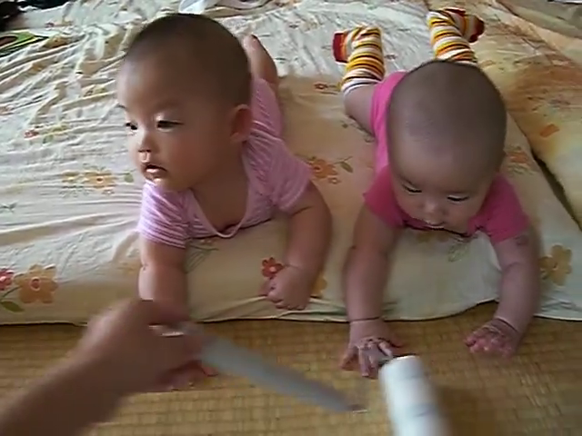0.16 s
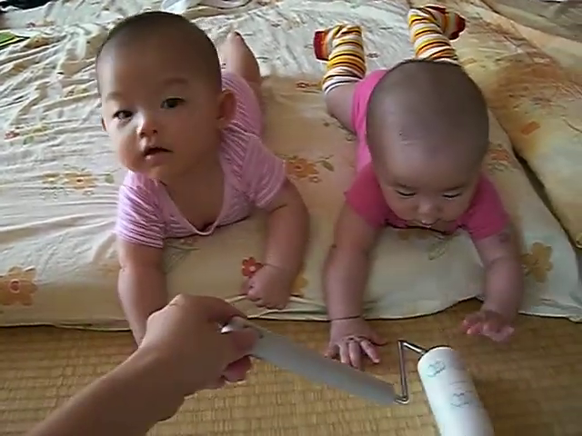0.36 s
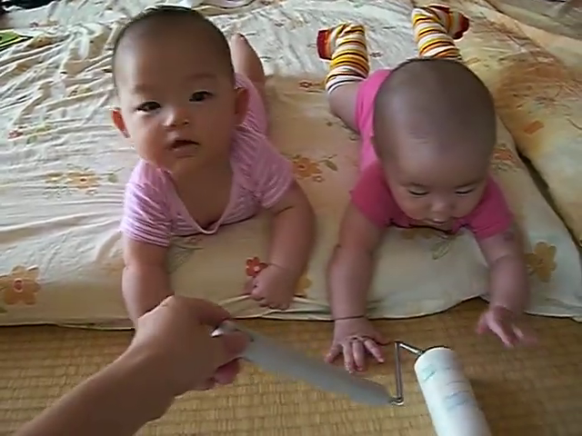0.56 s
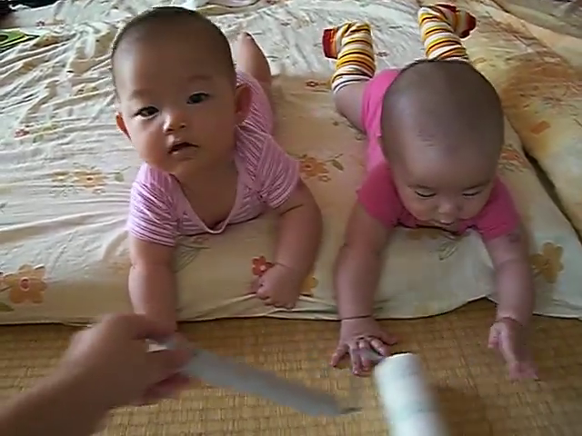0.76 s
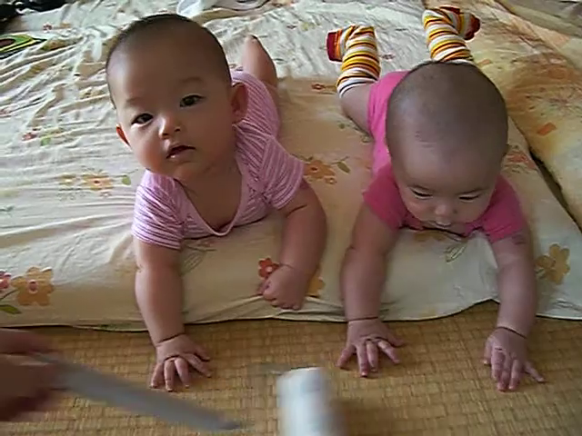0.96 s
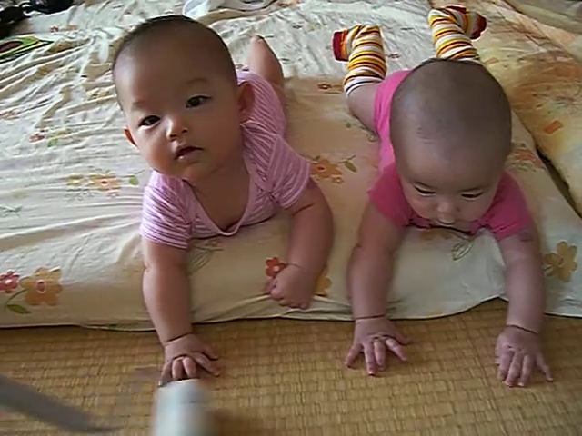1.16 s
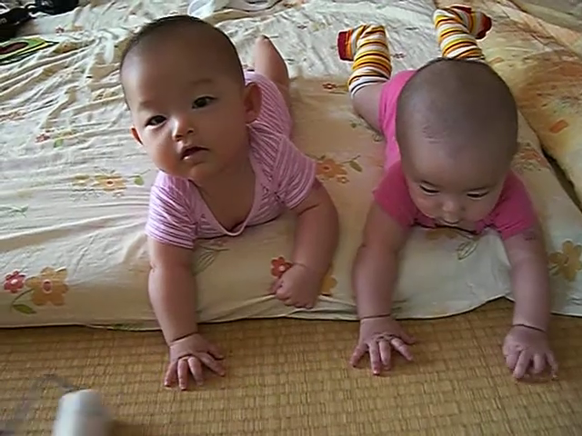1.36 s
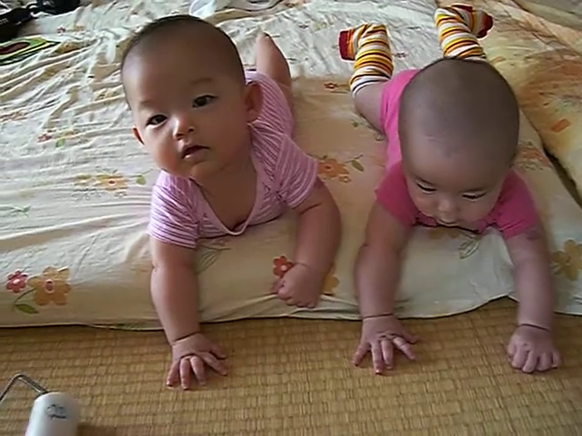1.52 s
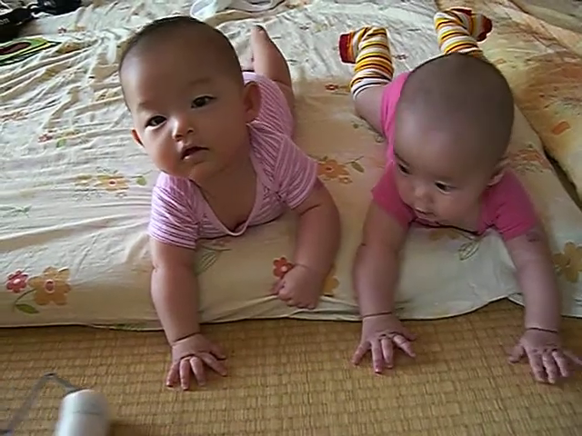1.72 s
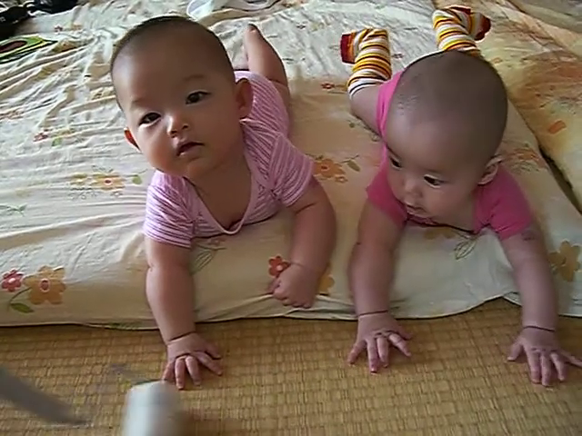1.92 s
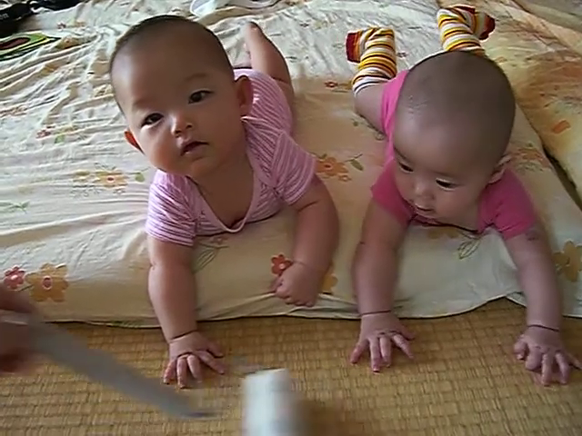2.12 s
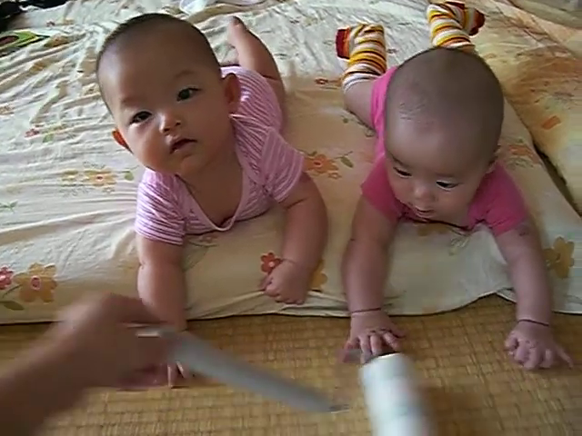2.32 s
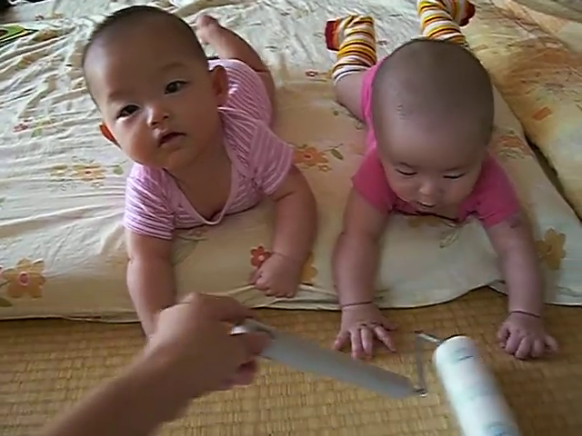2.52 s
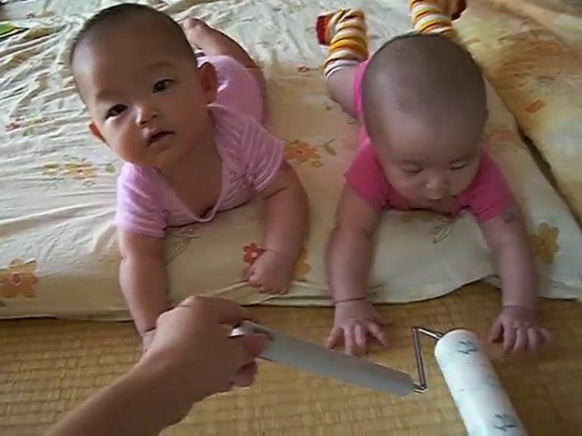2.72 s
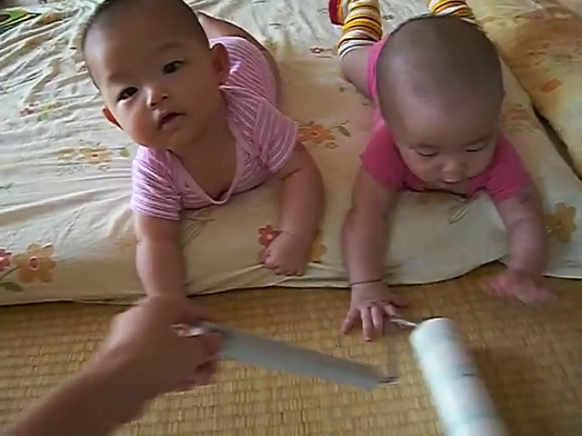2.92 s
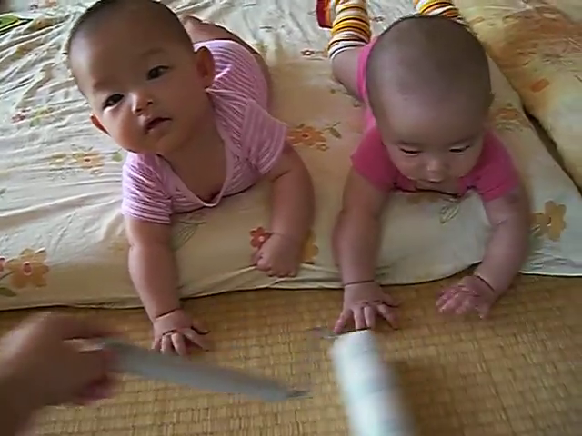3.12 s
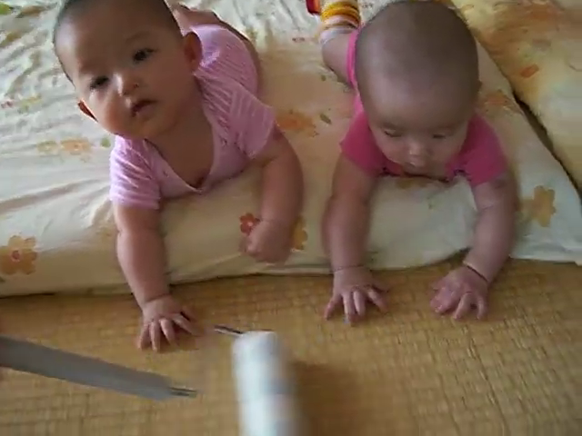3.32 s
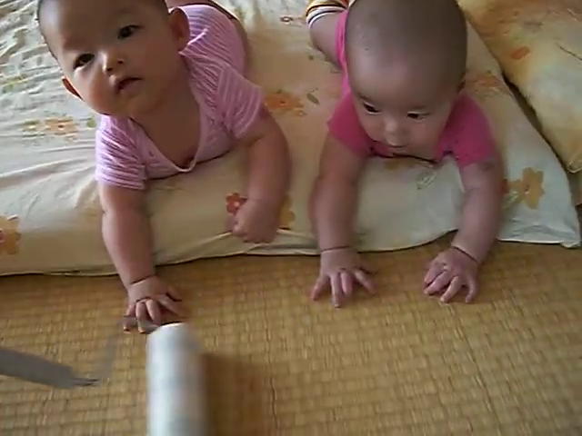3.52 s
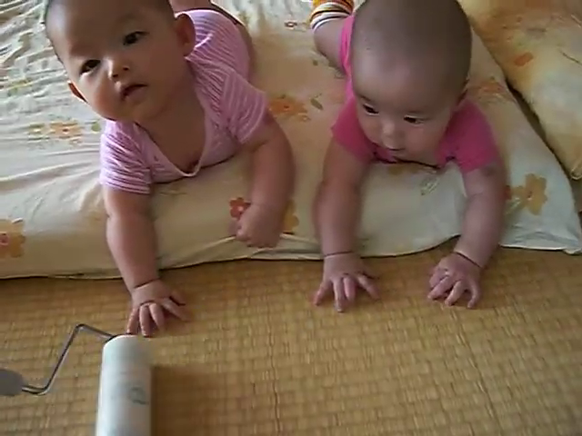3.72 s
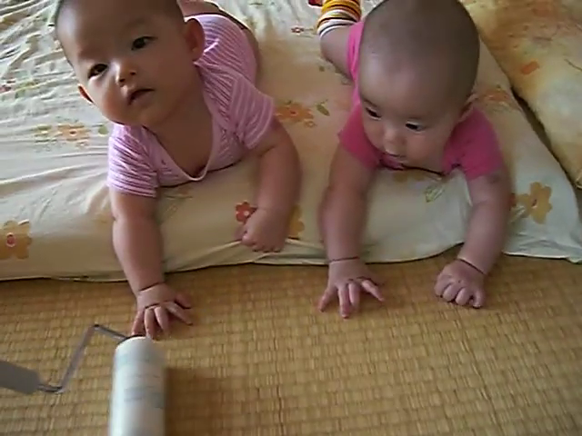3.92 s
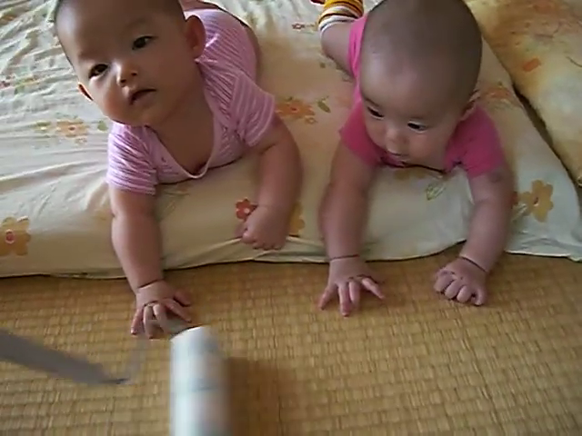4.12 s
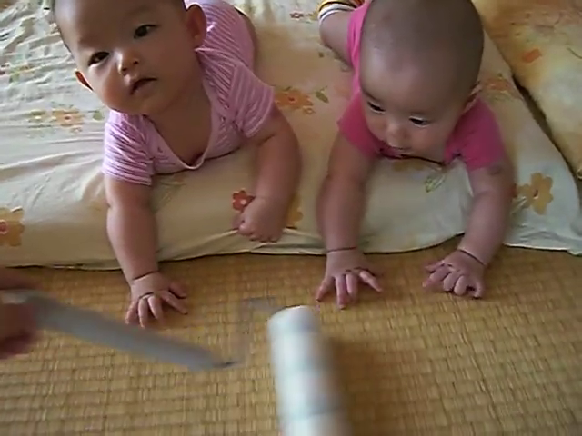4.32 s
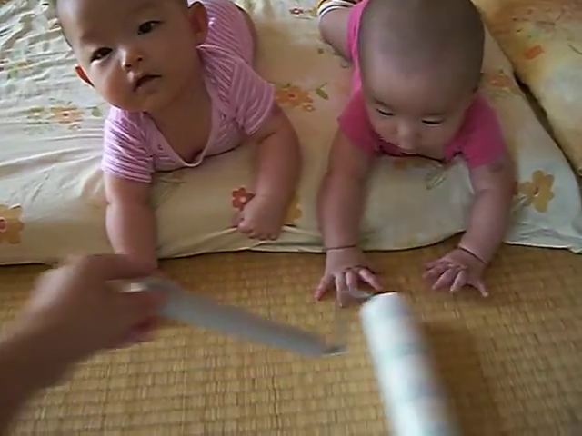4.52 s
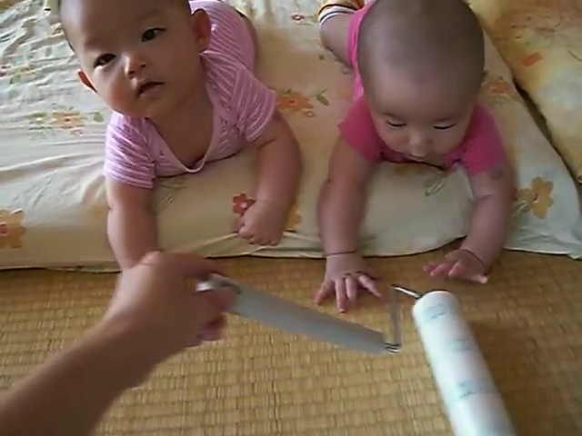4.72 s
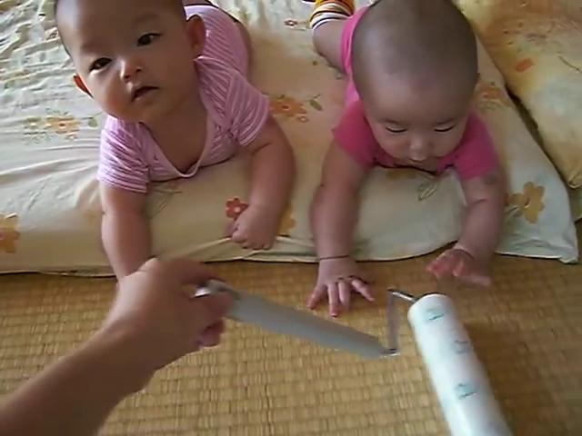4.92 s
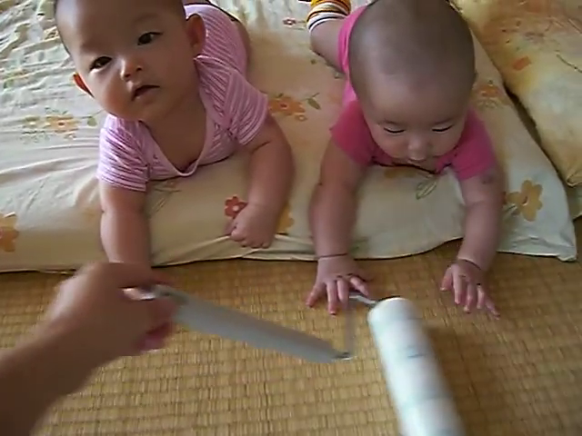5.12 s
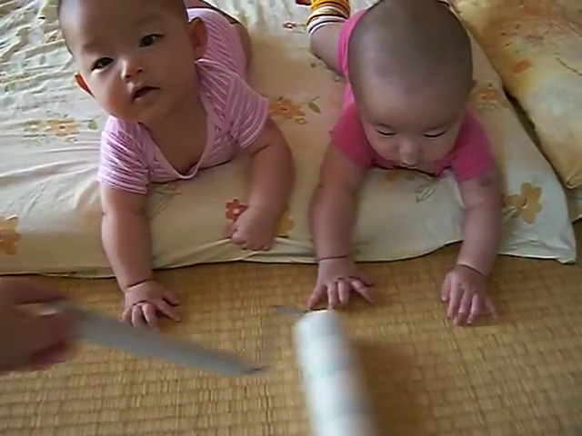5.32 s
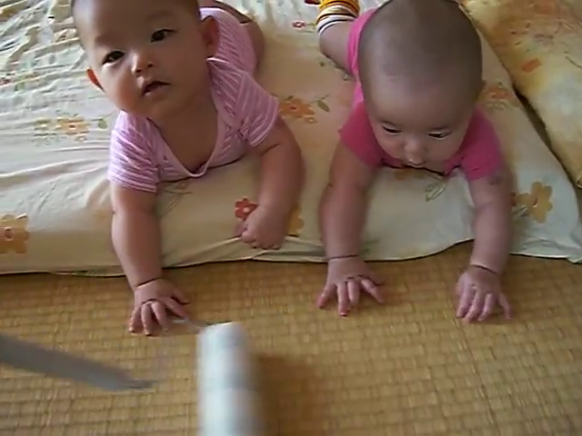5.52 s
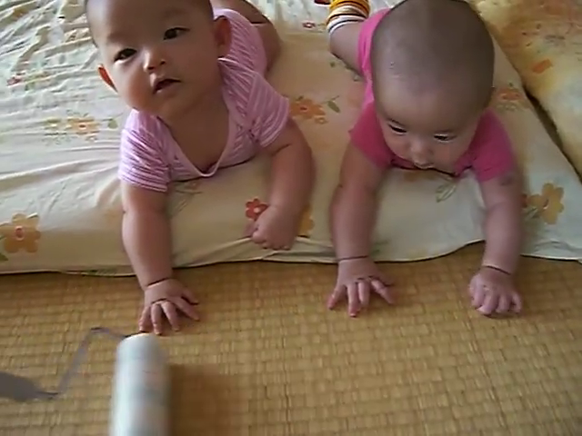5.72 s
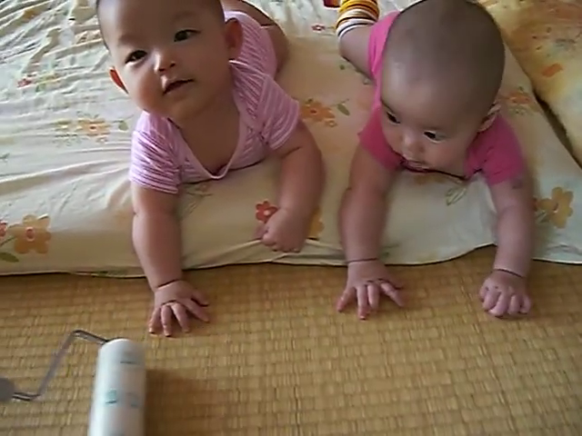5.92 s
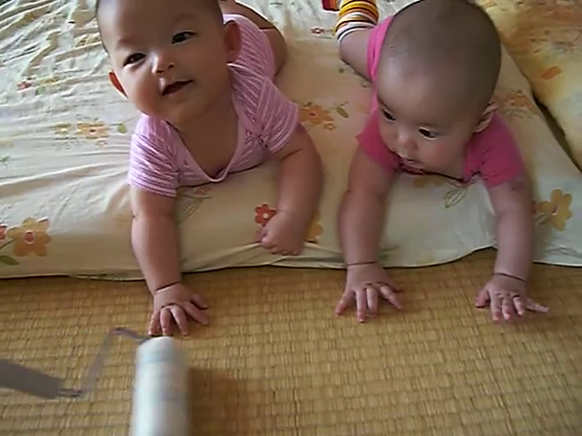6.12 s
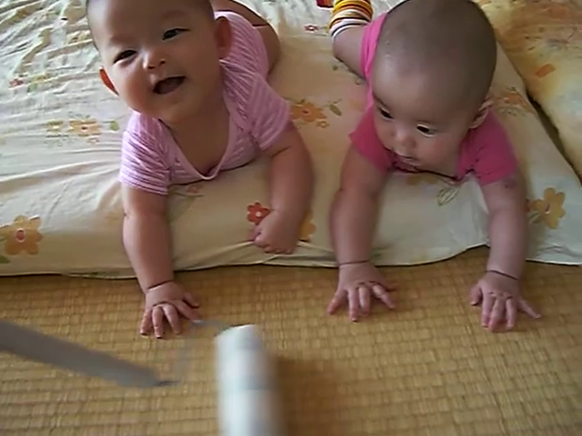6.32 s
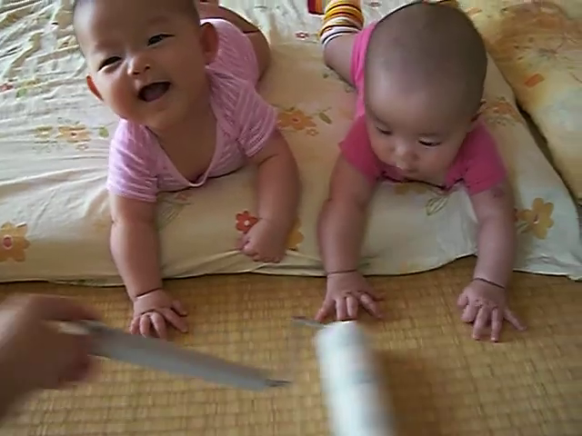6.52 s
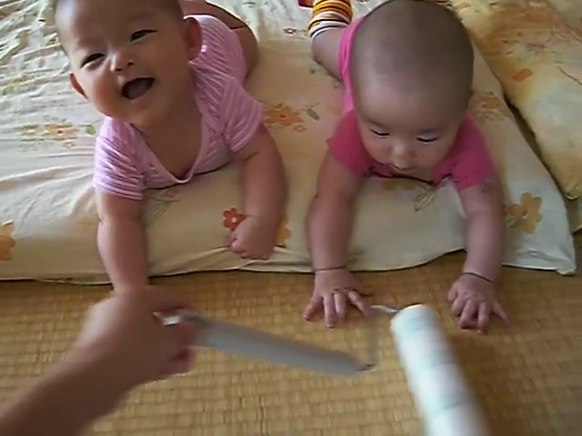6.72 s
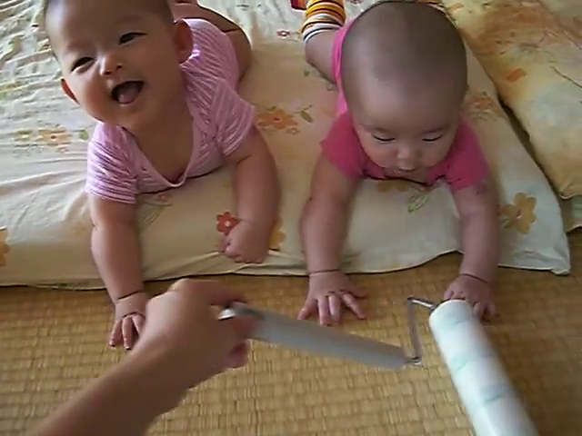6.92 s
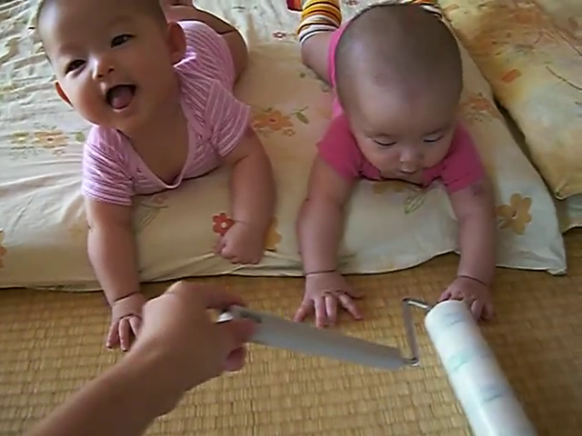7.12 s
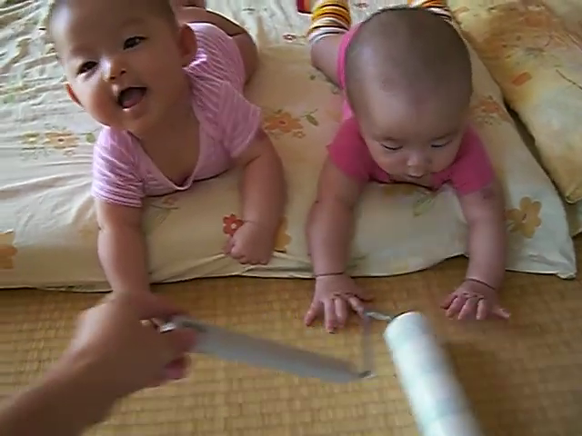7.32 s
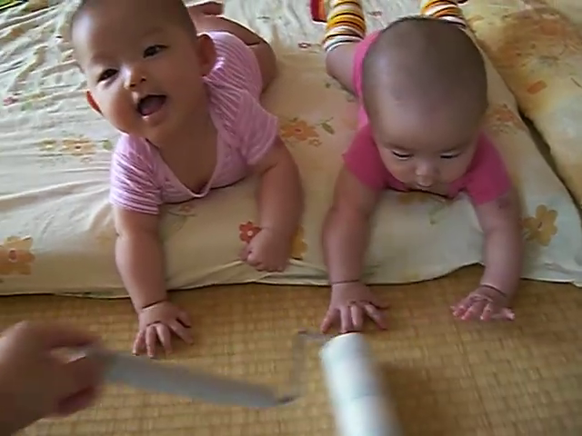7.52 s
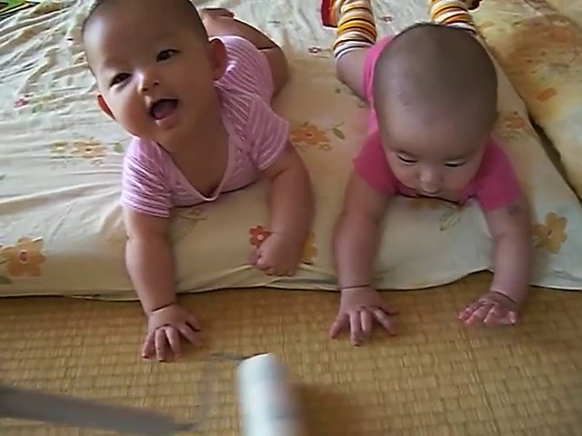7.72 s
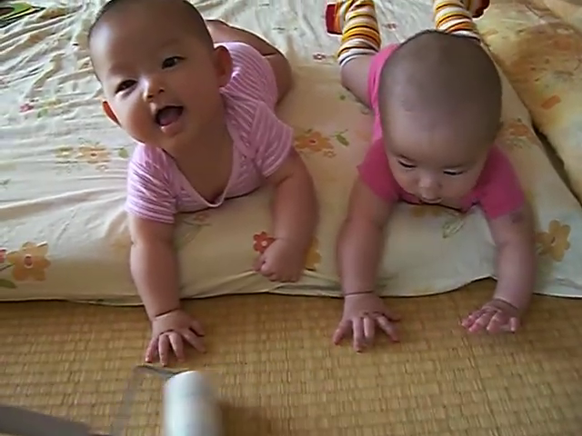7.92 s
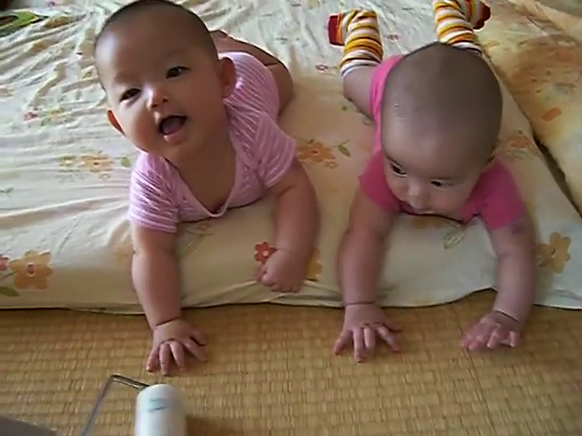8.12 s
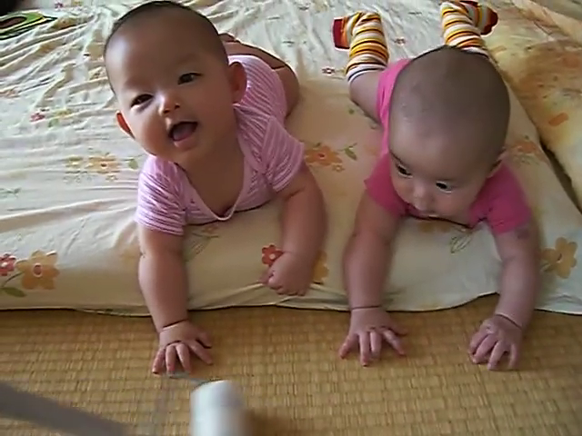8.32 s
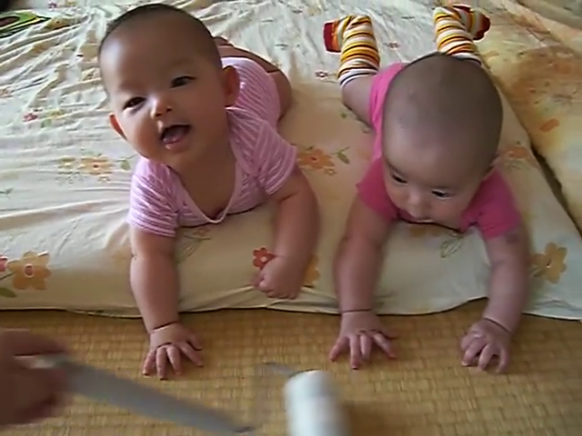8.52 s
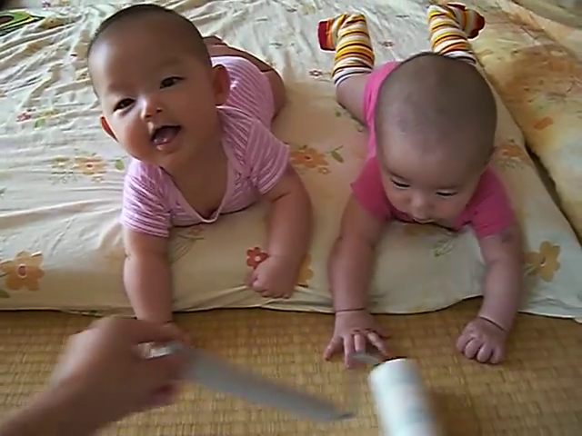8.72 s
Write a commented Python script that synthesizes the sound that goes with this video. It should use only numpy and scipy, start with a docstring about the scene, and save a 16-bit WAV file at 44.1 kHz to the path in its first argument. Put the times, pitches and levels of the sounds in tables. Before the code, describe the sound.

A sticky lint roller rolls back and forth over a woven straw mat with an even, crackling rasp.

```python
"""A sticky lint roller is pushed and pulled over a woven straw mat, about one stroke a second.
Its tape peels by stick and slip: straws let go in clumps of tiny snaps, which excite the tape sheet
and the modes of the hollow roll. The ridges of the weave make the roll rumble, and at one turn it
knocks on its axle. A near reflection, its delay following the roller, sweeps a comb filter through
the crackle. A small room reverberates over quiet air noise."""
import sys
import numpy as np
from scipy import signal
from scipy.fft import rfft, irfft, next_fast_len
from scipy.io import wavfile
from scipy.ndimage import uniform_filter1d, map_coordinates

SR = 44100
rng = np.random.default_rng(int(sys.argv[2]) if len(sys.argv) > 2 else 0)


def put_to_file(sound):
    """Save the sound as 16-bit audio at rate SR, in the file named by the first command-line argument."""
    columns = np.atleast_2d(sound).T  # one column per channel
    safe = np.clip(columns, -1, 1)
    whole_steps = np.round(safe * 32767)
    wavfile.write(sys.argv[1], SR, whole_steps.astype(np.int16))


N = 386309

# Arm strokes, pushes to the right and pulls to the left in turn: start t/s, fastest t/s, end t/s,
# crackle level/dB, then relative to it: roll ring level/dB, fizz level/dB, rumble level/dB
ARM_STROKES = [(-0.59, 0.099, 0.44, -23, -7.5, -3, -16.5), (0.54, 1.17, 1.56, -24, -6.5, -2, -15),
               (1.59, 2.311, 2.655, -23.5, -6, -2, -17), (2.75, 3.269, 3.805, -25.5, -7, -2.5, -15),
               (3.869, 4.471, 4.886, -25, -5.5, -1.5, -16), (4.95, 5.56, 5.93, -25, -6.5, -2.5, -15),
               (5.97, 6.559, 7.035, -23.5, -5, -2.5, -16), (7.179, 7.66, 8.085, -24.5, -7.5, -2, -14.5),
               (8.189, 8.558, 9.46, -24, -5.5, -3.5, -17.5)]
# Where the roller turns, before and after each stroke: place (0 = far right, 1 = far left)
TURN_PLACES = [.9, .11, 1, .08, .85, .1, .9, 0, .82, .1]
# Brief losses of adhesion: centre t/s, half length/s, change of level/dB
GRIP_LAPSES = [(0.108, 0.018, -4), (0.282, 0.018, -4.5), (0.789, 0.02, -4), (0.979, 0.018, -3.5),
               (1.199, 0.015, -6), (1.33, 0.015, -3.5), (2.069, 0.024, -4.5), (3.051, 0.026, -4.5),
               (3.235, 0.027, -5.5), (3.427, 0.019, -3.5), (3.647, 0.025, -5), (4.1, 0.027, -4.5),
               (5.21, 0.016, -5), (5.41, 0.02, -6), (5.708, 0.028, -8.5), (6.249, 0.026, -5.5),
               (6.935, 0.025, -6.5), (7.66, 0.042, -6), (8.621, 0.021, -3.5)]
# Big snaps of single straws letting go: t/s, relative level/dB
BIG_SNAPS = [(0.3245, -8), (0.359, -10), (0.417, -13), (0.5591, -27), (0.595, -30), (0.6274, -27),
             (0.65, -20.5), (0.7155, -10), (1.5275, -22), (1.6336, -24.5), (1.6617, -29), (1.9627, -26),
             (2.5189, -14), (2.6071, -12), (2.7549, -22.5), (2.7839, -21), (2.798, -16.5), (2.8146, -20),
             (2.862, -8.5), (2.9306, -12), (3.1993, -6.5), (3.5382, -6.5), (3.5523, -6.5), (3.5856, -24),
             (3.6253, -11), (3.698, -7.5), (3.8997, -25.5), (3.9502, -16.5), (4.0209, -15), (4.0632, -9),
             (4.1981, -6), (4.6629, -11), (4.7339, -9.5), (4.8146, -16), (4.851, -27), (4.9708, -20),
             (4.9916, -20), (5.0008, -8), (5.0105, -10.5), (5.1274, -8), (5.1843, -5.5), (5.7484, -7),
             (5.798, -13), (5.8832, -9.5), (6.0085, -24), (6.0636, -14.5), (6.0899, -11.5), (6.3227, -11),
             (6.646, -2.5), (6.7712, -5), (6.8498, -8), (6.8778, -23), (6.9392, -26), (6.9808, -25),
             (7.0005, -29), (7.0269, -31), (7.1923, -17.5), (7.217, -16), (7.2487, -14), (7.3374, -4),
             (7.9337, -5), (8.0695, -21), (8.121, -22), (8.2109, -21), (8.2364, -16.5), (8.4481, -5),
             (8.63, -4)]
# Spectra of the tape's crackle and of its high fizz: f/Hz, relative level/dB
CRACKLE_SPECTRUM = [(60, -23.5), (200, -15.5), (700, -9.5), (1400, -11), (1750, -12), (2200, -3.5),
                    (2750, -3), (3300, 1.5), (4200, 1.5), (5200, 0.6), (6200, -1.5), (7200, -4.5),
                    (9000, -12), (12000, -20.5), (16000, -40)]
FIZZ_SPECTRUM = [(4000, -57), (7500, -6), (9500, 0), (12500, 5), (14000, 9), (15700, 11.5)]
# Modes of the tape sheet, and of the roll at each end of its travel: f/Hz, width/Hz, relative level/dB
SHEET_MODES = [(3970, 380, 0)]
ROLL_MODES_LEFT = [(1020, 288, -1.5), (1218, 275, 2.5), (2540, 1200, -11.5)]
ROLL_MODES_RIGHT = [(883, 139, -1), (1123, 178, 5), (2190, 390, -12)]
# What a small near surface returns when faced squarely: f/Hz, level/dB
REFLECTION_GAIN = [(500, -22), (1500, -17), (3200, -12), (6200, -7.5), (9000, -13), (15000, -16)]
# Spectrum of the roll on the weave: f/Hz, relative level/dB
RUMBLE_SPECTRUM = [(30, -31), (70, -16), (110, -8.5), (175, 2.5), (260, 1), (400, -0.5), (550, -1),
                   (750, -11.5), (1400, -13.5)]
# Reverberation time of the room: f/Hz, T60/s
ROOM_DECAY = [(200, 0.15), (1000, 0.23), (4000, 0.13), (15000, 0.1)]
# Spectrum of the air noise: f/Hz, relative level/dB
AIR_SPECTRUM = [(25, -2), (60, 1), (120, 2), (300, -3.5), (800, -0.5), (1600, -10), (4000, -11),
                (8000, -24), (15500, -17)]
# The roll shifting on its axle: t/s, level/dB
AXLE_KNOCKS = [(3.839, -9)]
# Narrow dips in the treble: f/Hz, width/Hz
TREBLE_NOTCHES = [(4720, 670), (7890, 340), (9390, 334), (14100, 180)]


def amp(db):
    """Amplitude ratio of a level in decibels."""
    return 10 ** (np.asarray(db) / 20)


def unit(x):
    """Normalisation to an rms of 1."""
    return x / np.sqrt(np.mean(x ** 2) + 1e-20)


def along(points, hz):
    """Interpolation of (f/Hz, value) points on a logarithmic frequency axis."""
    f, v = np.transpose(points)
    return np.interp(np.log(hz + 1), np.log(f + 1), v)


def filtered(x, response):
    """Linear filtering: the spectrum is multiplied by a complex frequency response."""
    size = next_fast_len(N + SR // 2)
    return irfft(rfft(x, size) * response(np.fft.rfftfreq(size, 1 / SR)), size)[:N]


def coloured(x, spectrum, size=4096):
    """Minimum-phase filtering: a folded cepstrum gives a causal response of unit energy."""
    cepstrum = irfft(np.log(amp(along(spectrum, np.fft.rfftfreq(size, 1 / SR)))))
    cepstrum[1:size // 2] *= 2
    cepstrum[size // 2 + 1:] = 0
    pulse = irfft(np.exp(rfft(cepstrum)))
    return signal.fftconvolve(x, pulse / np.linalg.norm(pulse))[:N]


def ring(x, modes):
    """Modal superposition: x drives damped cosines of alternating sign and unit total energy."""
    t = np.arange(SR // 20) / SR
    pulse = sum((-1) ** k * amp(db) * width * np.exp(-np.pi * width * t) * np.cos(2 * np.pi * hz * t)
                for k, (hz, width, db) in enumerate(modes))
    return signal.fftconvolve(x, pulse / np.linalg.norm(pulse))[:N]


def steadied(x, span_s):
    """Division by the running rms holds the power near 1 and keeps the grain."""
    window = signal.windows.hann(2 * int(span_s * SR) + 3)
    power = np.abs(signal.fftconvolve(x ** 2, window / window.sum(), "same"))
    return x / np.sqrt(power + 1e-9)


def per_stroke(values):
    """Linear interpolation: one value holds through each stroke and glides to the next at the turn."""
    spans = np.array(ARM_STROKES)[:, [0, 2]].ravel()
    return np.interp(np.arange(N) / SR, spans, np.repeat(values, 2))


def arm_motion():
    """Reciprocating motion: speed follows quarter sines, place their integral. All results run 0-1."""
    t = np.arange(N) / SR
    speed, left = np.zeros(N), np.full(N, float(TURN_PLACES[0]))
    travels = np.diff(TURN_PLACES)
    for (start, fastest, end, *_), travel in zip(ARM_STROKES, travels):
        phase = np.interp(t, [start, fastest, end], [0, np.pi / 2, np.pi])
        speed += np.sin(phase)
        quarter_s = np.where(t < fastest, fastest - start, end - fastest)
        covered = fastest - start - quarter_s * np.cos(phase)
        left += travel * covered / (end - start)
    return speed, left, per_stroke(travels > 0)


def grip(waver_db=0.76, knots_per_s=18, surge_share=0.35, surge_lead_s=0.03):
    """Adhesion, in dB: the tape's hold on the mat wavers, and builds up before each lapse."""
    t = np.arange(N) / SR
    hump = lambda at, half_s: np.exp(-np.minimum(((t - at) / half_s) ** 2, 20))
    lapses = sum(db * (hump(at, half) - surge_share * hump(at - half - surge_lead_s, half_s=0.025))
                 for at, half, db in GRIP_LAPSES)
    waver = map_coordinates(rng.standard_normal(1000), [t * knots_per_s], mode="mirror")
    return waver_db * waver + lapses


def tearing(rate, haze, decay_s=0.00089, scatter_db=3, threads_per_s=6000):
    """Shot noise: each straw lets go with one tick and a short spray of breaking glue threads."""
    passed = np.cumsum(rate) / SR
    spacing = rng.gamma(4, 1 / 4, size=8000)  # the weave is only roughly even
    at = np.searchsorted(passed, np.cumsum(spacing))
    at = at[at < N]
    straws = np.bincount(at, amp(scatter_db * np.clip(rng.standard_normal(len(at)), -2, 2)), N)
    fade = np.exp(-np.arange(SR // 20) / SR / decay_s)
    spray_power = np.abs(signal.fftconvolve(straws ** 2, fade / fade.sum())[:N])
    threads = unit(rng.standard_normal(N) * (rng.random(N) < threads_per_s / SR))
    return 0.62 * straws + threads * np.sqrt(spray_power + haze ** 2 * rate / SR)


def peeling(peel_db, stuck_db=-49):
    """Stick and slip: faster rolling frees more straws, and harder, until ticks merge into a rasp."""
    pace = amp(np.minimum(peel_db + 23, 3))
    straws_per_s = 55 + 400 * pace
    grain = tearing(straws_per_s, haze=0.12 + 0.5 * pace)
    slipping = 1 / (1 + amp(-2 * (peel_db - stuck_db)))  # at the turns the tape stays stuck
    return amp(peel_db) * slipping * steadied(grain, span_s=0.022)


def snapping(peel_db, strays_per_s=9, above_db=13, scatter_db=2.5):
    """Sudden release of single straws, as (t/s, level/dB): big snaps, and strays tied to the peeling."""
    gaps, sizes = rng.random((300, 2)).T
    times = np.cumsum(0.5 + gaps) / strays_per_s
    strays = [(at, peel_db[int(at * SR)] + above_db + scatter_db * (1 - 2 * size))
              for at, size in zip(times, sizes) if at < N / SR]
    return list(BIG_SNAPS) + strays


def holding(snaps, lead_s=0.0098, depth_db=-7.5):
    """Elastic loading: while tension builds before each snap, the gain of the rasp dips."""
    t = np.arange(N) / SR
    times = np.append(np.sort(np.transpose(snaps)[0]), np.inf)
    wait = times[np.searchsorted(times, t)] - t
    return amp(depth_db * np.exp(-(wait / lead_s) ** 2))


def blows(events, life_s, spray):
    """Impulsive excitation: each event is a pulse and a brief noise, spray times its size."""
    force, t = np.zeros(N + SR), np.arange(SR // 50) / SR
    for at, db in events:
        trail = rng.standard_normal(len(t)) * np.exp(-(t / life_s) ** 2)
        burst = spray * trail / np.linalg.norm(trail)
        burst[0] = 1
        force[round(at * SR):][:len(t)] += amp(db) * burst / np.linalg.norm(burst)
    return force[:N]


def varied(x, depth_db):
    """Random spectral modulation: no two straws sound alike, so the colour shifts within milliseconds."""
    spectra = signal.stft(x, nperseg=128)[2]
    field = uniform_filter1d(rng.standard_normal(spectra.shape), size=6, axis=0)
    field = uniform_filter1d(field, size=3, axis=1)
    gain = unit(amp(depth_db * unit(field)))
    return signal.istft(spectra * gain, nperseg=128)[1][:N]


def tape(peel_db, speed, left, facing):
    """Forced vibration: every snap sounds through the tape sheet and rings the hollow roll."""
    *_, ring_levels, fizz_levels, _ = np.transpose(ARM_STROKES)
    ring_db = per_stroke(ring_levels) + 2 * (1 - speed) + left
    fizz_db = per_stroke(fizz_levels) + 2.5 * (1 - speed) - 2.5 * left
    events = snapping(peel_db)
    rasp = peeling(peel_db) * holding(events)
    snaps = amp(6.5) * blows(events, life_s=0.0026, spray=1.83)
    force = varied(rasp + snaps, depth_db=1.5)
    crackle = amp(-0.22) * coloured(force, CRACKLE_SPECTRUM)
    fizz = coloured(force * amp(fizz_db), FIZZ_SPECTRUM)
    sheet = amp(-12.5) * ring(force * (1 - facing) * (1 - left), SHEET_MODES)  # sharpest late in a push
    # single snaps ring the roll slightly less than the rasp does
    drive = (rasp + 0.88 * snaps) * amp(ring_db)
    hollow = left * ring(drive, ROLL_MODES_LEFT) + (1 - left) * ring(drive, ROLL_MODES_RIGHT)
    return crackle + fizz + sheet + hollow


def near_reflection(x, left, facing, right_lag_ms=1.05, left_lag_ms=2.15):
    """Comb filtering: x interferes with its echo off a close surface, later as the roller moves left."""
    lag_ms = right_lag_ms + (left_lag_ms - right_lag_ms) * left
    echo = map_coordinates(x, [np.arange(N) - lag_ms * SR / 1000], order=3)
    return x + facing * filtered(echo, lambda hz: amp(along(REFLECTION_GAIN, hz)))


def rumble(level_db, bumps_per_s=1500):
    """Roughness excitation: the roll bumps at random over the ridges of the weave."""
    bumps = rng.standard_normal(N) * (rng.random(N) < bumps_per_s / SR)
    return amp(level_db) * steadied(coloured(bumps, RUMBLE_SPECTRUM), span_s=0.062)


def room(x, gap_s=0.004, count=24):
    """Reverberation: tails crossfade over time, as the walls answer each roller place differently."""
    walls = np.zeros(N)
    place = np.linspace(0, count - 1, N)
    for k in range(count):
        hz, t, spectra = signal.stft(rng.standard_normal(SR // 3), SR, nperseg=256)
        decay = amp(-60 * t / along(ROOM_DECAY, hz)[:, None])  # the treble dies first
        tail = signal.istft(spectra * decay, SR, nperseg=256)[1]
        tail = np.pad(tail / np.linalg.norm(tail), (int(gap_s * SR), 0))
        near = np.flatnonzero(np.abs(place - k) < 1)
        crossfade = np.cos((place[near] - k) * np.pi / 2)
        answer = signal.fftconvolve(x[near] * crossfade, tail)[:N - near[0]]
        walls[near[0]:][:len(answer)] += answer
    return walls


def air():
    """Stationary noise: the air of the room, strongest in the bass."""
    return coloured(rng.standard_normal(N), AIR_SPECTRUM)


def axle_knock():
    """Impact excitation: the roll shifts on its axle and rings in its own modes."""
    return ring(blows(AXLE_KNOCKS, life_s=0.0027, spray=0.74), ROLL_MODES_LEFT)


def scene():
    """Superposition: tape and roll, driven by the arm's speed, add to reverberation and air noise."""
    speed, left, pulling = arm_motion()
    slope_db = 22 * (1 - pulling) + 15 * pulling  # crackle gained per tenfold speed
    facing = 0.13 * (1 - pulling) + pulling  # how squarely the peeling edge faces the near surface
    *_, crackle_levels, _, _, rumble_levels = np.transpose(ARM_STROKES)
    effort_db, grip_db = per_stroke(crackle_levels), grip()
    peel_db = effort_db + grip_db + slope_db * np.log10(speed + 1e-4)
    rolling_speed = np.hypot(speed, 0.091)  # the hand never quite rests at a turn
    rumble_db = effort_db + per_stroke(rumble_levels) + 0.85 * grip_db + 16 * np.log10(rolling_speed)
    crackle = tape(peel_db, speed, left, facing)
    direct = near_reflection(crackle, left, facing) + rumble(rumble_db) + axle_knock()
    return (direct + amp(-12) * room(direct) + amp(-53) * air())[None]


def record(dry):
    """Notch and low-pass filtering: four narrow dips in the treble, and nothing above the band limit."""
    depth, top_hz = 0.86, 15820

    def response(f):
        dips = [1 - depth * 1j * f * width / (centre ** 2 - f ** 2 + 1j * f * width)
                for centre, width in TREBLE_NOTCHES]
        return np.prod(dips, axis=0) * (f < top_hz)

    return filtered(dry[0], response)[None]


dry = scene()
out = record(dry)
put_to_file(out)
```